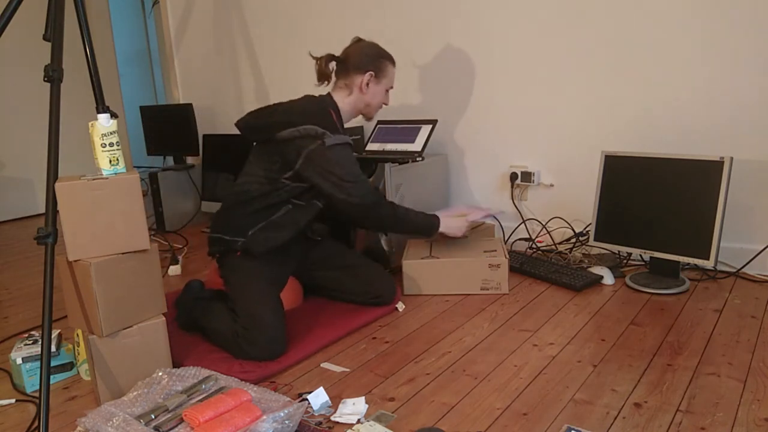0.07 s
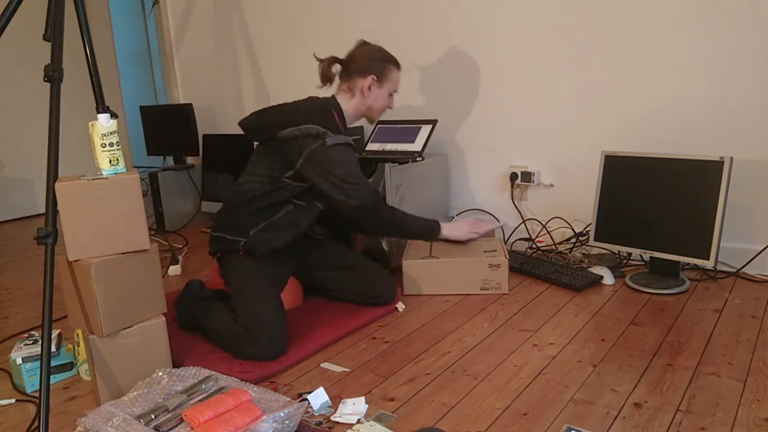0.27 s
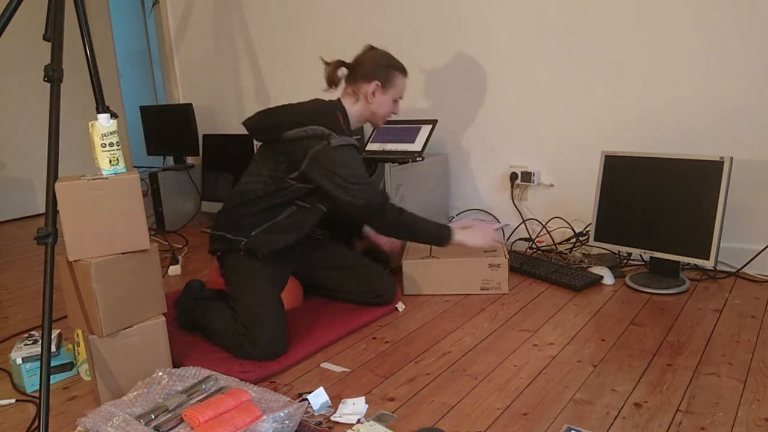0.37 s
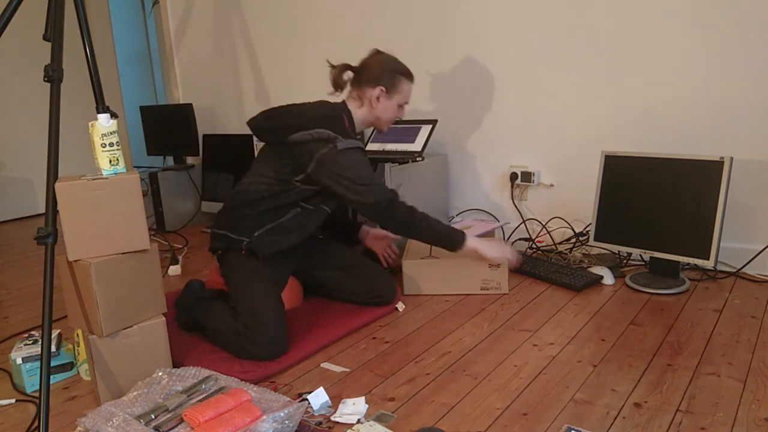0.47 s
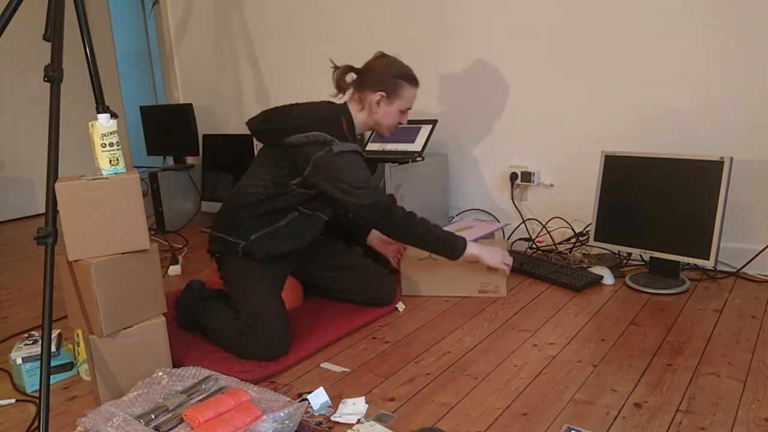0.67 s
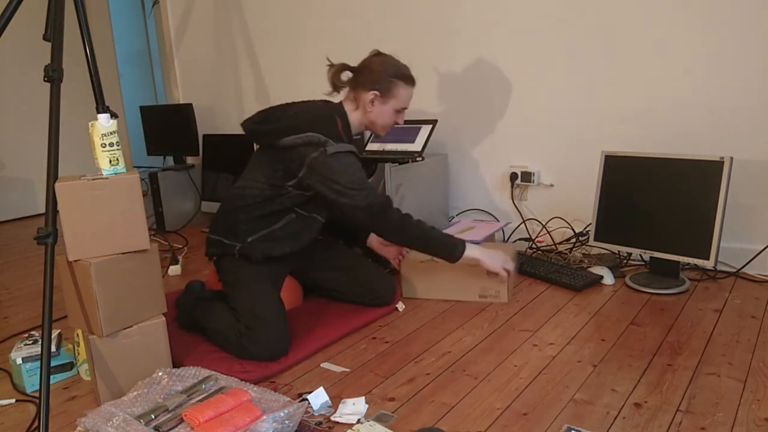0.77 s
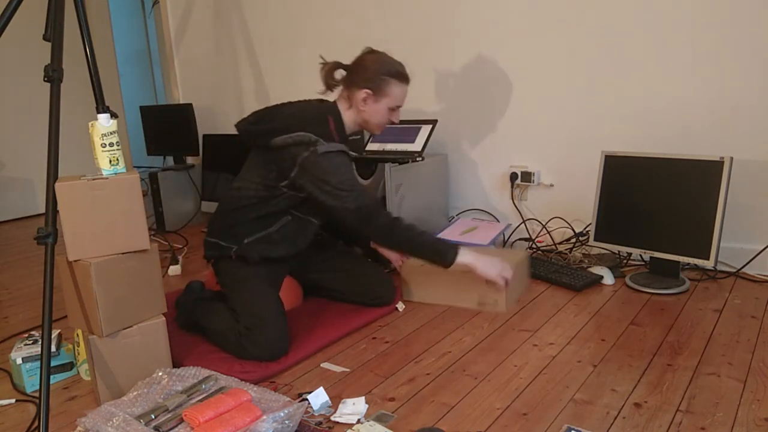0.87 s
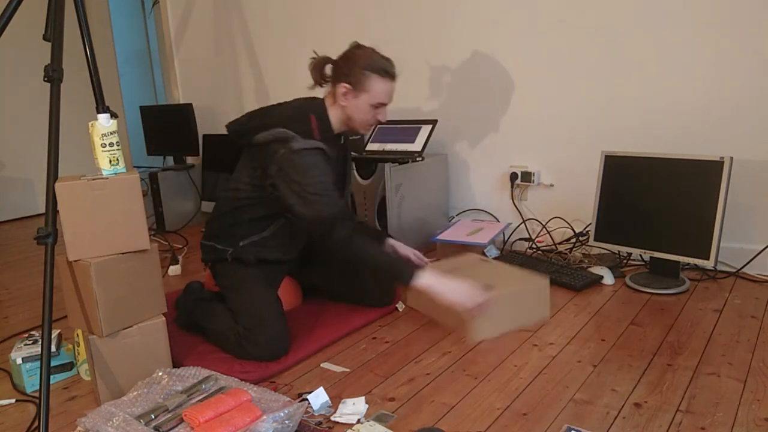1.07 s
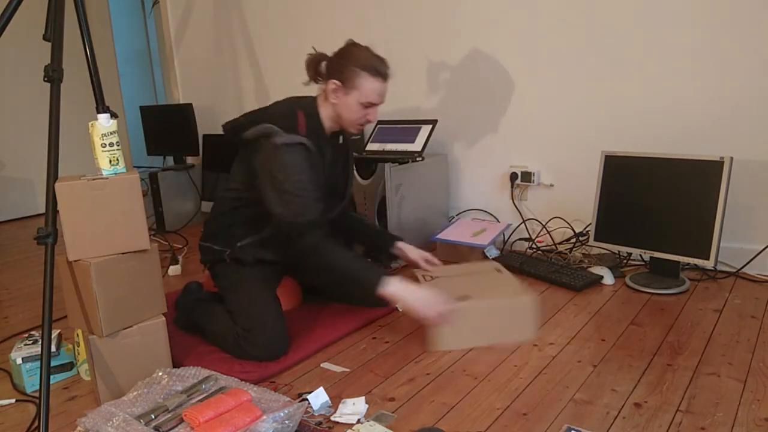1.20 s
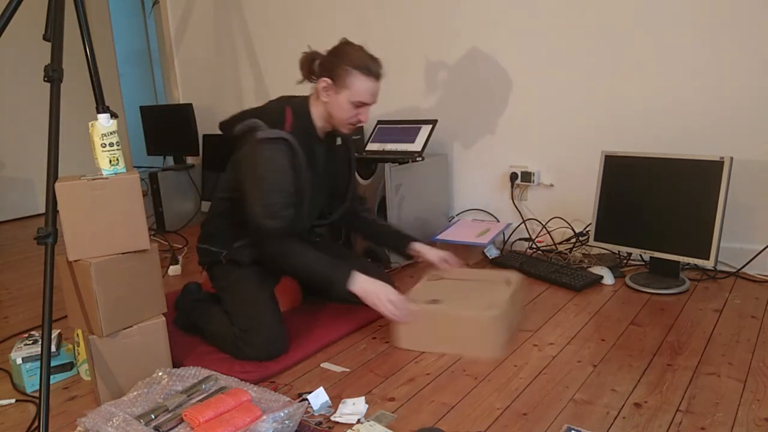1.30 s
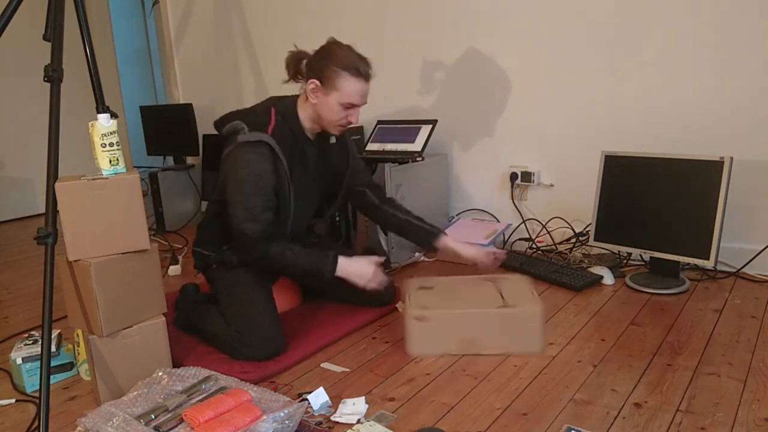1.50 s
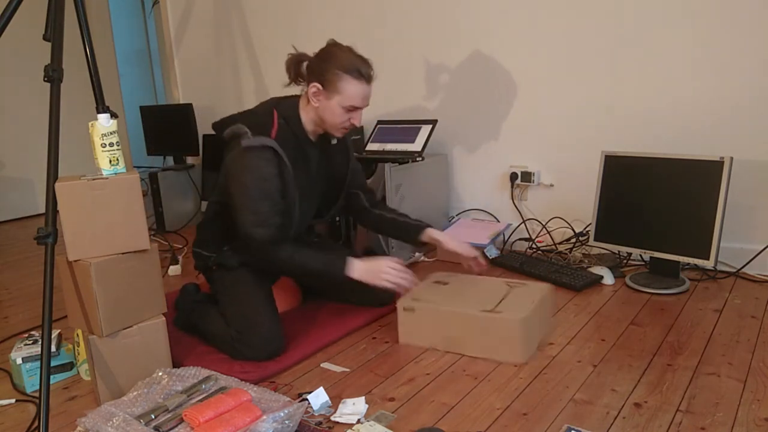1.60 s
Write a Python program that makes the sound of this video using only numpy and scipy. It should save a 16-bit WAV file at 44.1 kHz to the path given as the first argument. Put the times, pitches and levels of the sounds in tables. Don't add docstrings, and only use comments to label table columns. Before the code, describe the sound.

A small metal tool lands on a hollow cardboard box: faint ticks from 0.1 s, then a loud cluster of thuds and bright jingling rattles at 0.22-0.3 s, fading by 0.5 s. From about 0.6 s the box drags softly over floorboards, hissing and rumbling, with bumps and dry scuffs near 0.87, 1.05, 1.26 and 1.35 s. Short room echo, quiet hush and faint low hum.

```python
import sys
import numpy as np
from scipy import signal
from scipy.fft import rfft, irfft
from scipy.io import wavfile
from scipy.ndimage import uniform_filter1d

SR = 44100
rng = np.random.default_rng(int(sys.argv[2]) if len(sys.argv) > 2 else 0)


def bounce(signal):
    frames = np.transpose(np.atleast_2d(signal))
    limited = np.clip(frames, -1, 1)
    pcm = np.round(limited * 32767).astype(np.int16)
    wavfile.write(sys.argv[1], SR, pcm)


def nominal_scale(level):
    x = np.asarray(level, float) / 20
    return 10 ** x


N = 72765
T = np.arange(N) / SR

# (time [s], level [dB], contact [ms])
BLOWS = [(.2228, -17.5, 0.49), (.2285, -9, 1.7), (.232, -15.5, 3.7), (.2555, -7.5, 0.87),
         (.2572, -11.5, 0.69), (.2592, 1, 0.57), (.2635, -12.5, 0.76), (.266, -11, 0.54), (.2715, -3, 1.24),
         (.281, -11, 1.07), (.296, -22.5, 1.24), (.316, -15.5, 0.99), (.342, -13.5, 1.52),
         (.368, -18, 0.96), (.382, -16.5, 1.05), (.41, -36, 2.7), (.442, -28.5, 0.99), (.51, -35, 0.76)]
# (frequency [Hz], level [dB], t60 [s])
BOX = [(58.6, -53, 0.33), (108, -16.5, 0.12), (130, -32, 0.31), (180.3, 1, 0.042), (271, -6, 0.028),
       (342, -4, 0.054), (423, 0.5, 0.085), (540, 2.5, 0.058), (695, 0, 0.042), (756, 3.5, 0.027),
       (842, -6.5, 0.025), (1190, -12.5, 0.02), (1358, 5.5, 0.013), (1970, -21.5, 0.027)]

STRIKE_S, CHOKE_S = 0.0006, 0.005
RING_FLUTTER, RING_DAMP, TOOL_DETUNE = 0.55, 0.8, 0.008


def unit(x):
    return x / np.sqrt(np.mean(x ** 2))


def conv(x, h):
    return signal.fftconvolve(x, h)[:N]


def band_filter(x, order, low_hz, high_hz):
    return signal.sosfilt(signal.butter(order, [low_hz, high_hz], "band", fs=SR, output="sos"), x)


def colour(x, table):
    hz, db = np.array(table).T
    f = np.maximum(np.arange(N // 2 + 1) * SR / N, 1)
    return irfft(rfft(x) * nominal_scale(np.interp(np.log(f), np.log(hz), db)), N)


def walk(rate):
    k = int(SR / rate)
    return unit(uniform_filter1d(uniform_filter1d(rng.standard_normal(N), k), k))


def decay(t, t60):
    return np.exp(-np.log(1000) * t / t60)


def modes(table, gains=1, damp=1, detune=1):
    hz, db, t60 = np.array(table).T[:, :, None]
    t = T[:SR // 2]
    sign = (-1.0) ** np.arange(len(table))[:, None]
    tones = np.sin(2 * np.pi * hz * detune * t)
    return (sign * gains * nominal_scale(db) * decay(damp * t, t60) * tones).sum(axis=0)


def add(out, at_s, x):
    i = int(at_s * SR)
    out[i:i + len(x)] += x[:N - i]


def clicks(rate, spread_db):
    size = nominal_scale(spread_db * rng.exponential(size=N)) * rng.choice([-1, 1], N)
    return (rng.random(N) < rate / SR) * size


def burst(t, length):
    return t / length * np.exp(1 - t / length * 2)


def gaps_after(table):
    return np.abs(np.diff(np.array(table)[:, 0], append=N / SR))


def choke(t, gap):
    return np.exp(-np.maximum(t - gap, 0) / CHOKE_S)


def tool():
    # (time [s], tick [dB], low rings [dB], upper rings [dB])
    rattles = [(0.1033, -39, -48, -46), (0.117, -72, -55, -60), (0.14, -38.5, -48, -57),
               (0.163, -66, -52, -55), (0.182, -67, -55, -52), (0.221, -34, -45, -46),
               (0.2283, -15, -47, -35), (0.2394, -36, -30, -26.5), (0.2505, -15.5, -45, -22.5),
               (0.2592, -57, -39, -19), (0.2612, -21, -15, -6.5), (0.2644, -12, -49, -24),
               (0.274, -60, -17, -14), (0.28, -41, -23, -18), (0.2964, -13.5, -19.5, -26),
               (0.3036, -17.5, -22.5, -11.5), (0.3164, -70, -45, -29), (0.3393, -16.5, -64, -23),
               (0.364, -19.5, -50, -42), (0.3827, -43, -24.5, -44), (0.39, -27.5, -25, -22),
               (0.4104, -21, -33, -25), (0.4395, -28.5, -45, -49), (0.4588, -24, -53, -39),
               (0.4646, -61, -32, -33), (0.4796, -38, -37.5, -44), (0.524, -65, -42, -65),
               (0.627, -45, -47, -49.5), (0.8627, -38, -50, -44), (0.873, -51, -49, -72)]
    # (frequency [Hz], level [dB], t60 [s])
    metal = [(2600, -5, .05), (2900, -2, .09), (3210, -9, .04), (3440, -9, .03), (4110, -2, .07),
             (4840, 2, .08), (6000, -4, .03), (7210, -5, .05), (8880, 0, .06), (9400, -12, .02)]
    tick_s, chatter_s, chatter_db = 0.003, 0.015, -22
    tick_gain_db, ring_gain_db, ring_scatter_db = 0.5, -4.5, 2.2
    ticks, rings, t = np.zeros(N), np.zeros(N), T[:3000]
    high = np.array(metal)[:, :1] > 8000
    chance = rng.standard_normal((len(rattles), 2, len(metal), 1))
    shape = np.exp(-t / tick_s) + nominal_scale(chatter_db) * np.exp(-t / chatter_s)
    shape = shape * np.minimum(t / 0.00096, 1)
    for (s, tick_db, low_db, high_db), gap, c in zip(rattles, gaps_after(rattles), chance):
        contact = rng.standard_normal(3000) * shape
        gains = nominal_scale(np.where(high, high_db, low_db) + ring_scatter_db * c[0])
        ring = modes(metal, gains, RING_DAMP, 1 + TOOL_DETUNE * c[1])[:3000]
        flutter = uniform_filter1d(contact / shape.clip(1e-9), 90) * 9
        ring = ring * np.minimum(t / STRIKE_S, 1) * (1 + RING_FLUTTER * flutter)
        add(ticks, s, nominal_scale(tick_db + tick_gain_db) * band_filter(contact, 1, 1500, 6940))
        add(rings, s, nominal_scale(ring_gain_db) * ring * choke(t, gap) / 2)
    return ticks, rings


def crackles():
    # (time [s], crackle [dB], middle ring [dB], top ring [dB])
    top_contacts = [(0.1025, -47, -59, -72), (0.1407, -65, -67, -79), (0.1614, -70, -73, -80),
                    (0.1804, -68, -67, -77), (0.223, -43, -46, -57), (0.227, -33, -40, -52),
                    (0.2366, -40, -35, -43), (0.2504, -33, -36, -42), (0.2549, -28, -27, -41),
                    (0.2599, -13.5, -27, -40), (0.2623, -7, -30, -27), (0.2653, -16, -20.5, -43),
                    (0.2704, -13, -35, -43), (0.2757, -38, -21, -41), (0.279, -33, -26, -42),
                    (0.288, -35, -41, -36), (0.2967, -22, -25, -52), (0.3029, -29, -19, -40),
                    (0.3053, -38, -27, -52), (0.318, -27, -48, -40), (0.3386, -36, -29, -35),
                    (0.3633, -32, -36, -54), (0.3827, -38, -43, -54), (0.39, -32, -38, -53),
                    (0.3934, -41, -31, -50), (0.4063, -45, -36, -44), (0.408, -43, -38, -44),
                    (0.4184, -44, -40, -62), (0.4374, -44, -39, -52), (0.456, -48, -54, -53),
                    (0.4612, -42, -39, -59), (0.478, -41, -47, -65), (0.5104, -55, -46, -72),
                    (0.6275, -43, -58, -62), (0.8416, -37, -54, -66), (0.861, -44, -41, -60),
                    (0.8724, -42, -58, -69)]
    # (frequency [Hz], level [dB], t60 [s])
    top_modes = [(9890, -2, .05), (11680, 1, .1), (10900, -12, .02), (12800, -11, .02), (13600, -11, .02),
                 (14200, -11, .02)]
    crackle_gain_db, crackle_s, ring_gain_db = 0.5, 0.002, 3
    ticks, rings, t = np.zeros(N), np.zeros(N), T[:3000]
    chance = rng.standard_normal((len(top_contacts), len(top_modes), 1))
    for (s, tick_db, mid_db, top_db), gap, c in zip(top_contacts, gaps_after(top_contacts), chance):
        noise = rng.standard_normal((2, 3000))
        gains = nominal_scale(np.array([[mid_db]] + [[top_db]] * (len(top_modes) - 1)) + ring_gain_db)
        ring = modes(top_modes, gains, RING_DAMP, 1 + TOOL_DETUNE * c)[:3000]
        ring = ring * (1 + RING_FLUTTER * unit(uniform_filter1d(noise[0], 90)))
        bright = band_filter(noise[1], 2, 9000, 14800)
        add(ticks, s, nominal_scale(tick_db + crackle_gain_db) * bright * burst(t, crackle_s))
        add(rings, s, ring * np.minimum(t / STRIKE_S, 1) * choke(t, gap))
    return ticks, rings


def knocks(rows, body_modes, scatter_db, detune=0.035):
    body_gain_db, slap_gain_db, slap_s = -1, -7, 0.0053
    out, t = np.zeros(N), T[:2000]
    chance = rng.standard_normal((len(rows), len(body_modes), 1))
    for (s, db, ms), c in zip(rows, chance):
        push = np.hanning(int(ms * SR / 1000) + 3)
        ring = modes(body_modes, nominal_scale(scatter_db * c), detune=1 + detune * np.roll(c, 1))
        body = np.convolve(ring, push / push.sum())
        slap = rng.standard_normal(2000) * np.exp(-t / slap_s) * np.minimum(t / 0.00088, 1)
        add(out, s, nominal_scale(db + body_gain_db) * body / 3)
        add(out, s, nominal_scale(db + slap_gain_db) * band_filter(slap, 1, 900, 4000))
    return out


def landings():
    # (time [s], level [dB], contact [ms])
    pushes = [
        (.2275, -16, 2.46),
        (.2555, -12.5, 8.2),
        (1.003, -47, 8.4),
        (1.05, -39, 1.5),
    ]
    # (frequency [Hz], level [dB], t60 [s])
    thud = [(99.6, -0.5, 0.44), (136.6, 2, 0.22), (203, 7.5, 0.022), (341, 14, 0.053)]
    return knocks(pushes, thud, 0.38)


def drag():
    # (time [s], sliding speed as hiss [dB], weight on the box as rumble [dB])
    pull = [(0.6, -44, -37), (0.664, -54, -46.5), (0.798, -44, -45), (1.002, -41, -49.5),
            (1.012, -38.5, -48), (1.026, -40, -44.5), (1.222, -43, -42.5), (1.255, -42, -45),
            (1.311, -40.5, -47), (1.348, -39.5, -37.5), (1.482, -41, -43.5), (1.65, -46, -44.5)]
    # (frequency [Hz], density [dB per Hz])
    scrape = [(410, -1), (700, -10), (862, -7), (1080, -9), (1510, -6), (2890, -7.5), (5390, -7.5),
              (9070, -13), (15700, -28)]
    s, hiss_db, rumble_db = np.array(pull).T
    gate = np.clip((T - 0.54) / 0.16, 0, 1)
    hiss = unit(colour(clicks(14000, 1.3), scrape)) * nominal_scale(0.91 * walk(55))
    body = modes(BOX, nominal_scale(-0.4 * np.array(BOX)[:, 1:2]), damp=5.3)
    rumble = unit(conv(clicks(1200, 1.8), body))
    rumble = signal.sosfilt(signal.butter(2, 127, "high", fs=SR, output="sos"), rumble)
    hiss = hiss * nominal_scale(np.interp(T, s, hiss_db) + 0.5)
    rumble = rumble * nominal_scale(np.interp(T, s, rumble_db) - 2.5 + 0.75 * walk(24))
    return gate * (hiss + rumble)


def bumps():
    # (time [s], level [dB], contact [ms])
    joints = [(.688, -45, 3.3), (.7, -34.5, 0.56), (.715, -52, 1.7), (.754, -52, 0.31), (.866, -26.5, 2.4),
              (1.05, -27, 2.3), (1.078, -29, 0.21), (1.14, -27, 0.72), (1.186, -34, 0.62),
              (1.337, -36.5, 0.48), (1.362, -29, 0.4), (1.44, -49, 4.1)]
    return knocks(joints, BOX, 3.9)


def gap_drops():
    # (time [s], level [dB], contact [ms])
    drops = [
        (1.2625, -25, 0.18),
        (1.284, -44, 0.62),
    ]
    # (frequency [Hz], level [dB], t60 [s])
    board = [(187, -3, .25), (707, -7, .1), (268, -2, .25), (365, -3, .2), (325, 0, .3), (950, -4, .06),
             (860, 2, .13), (528, -6, .15)]
    settle_s, still_s = 1.297, 0.008
    return knocks(drops, board, 1.0, 0) * np.exp(-np.maximum(T - settle_s, 0) / still_s)


def scuffs():
    # (time [s], level [dB], centre [Hz], length [s], width [ratio])
    rubs = [(0.696, -40, 646, 0.0021, 1.2), (0.845, -53, 2180, 0.0027, 1.8),
            (0.855, -40.5, 1360, 0.016, 1.13), (0.881, -37, 1470, .008, 0.82),
            (1.0092, -28, 5000, 0.0012, 1.06), (1.012, -34.5, 3500, 0.0046, 1.34),
            (1.028, -35.5, 2400, 0.0058, 1.03), (1.06, -47, 2200, 0.0041, 1.3),
            (1.142, -38.5, 1300, 0.0047, 1.24), (1.144, -32, 5170, 0.0035, 1.1),
            (1.3403, -28, 1320, 0.0042, 1.35), (1.343, -36, 714, 0.0096, 0.82),
            (1.484, -42, 13000, .0096, 2.5)]
    out, t = np.zeros(N), T[:3000]
    for s, db, hz, length, width in rubs:
        ratio = max(width, 1.01)
        grit = band_filter(rng.standard_normal(3000), 1, hz / ratio, min(hz * ratio, SR / 2.5))
        add(out, s, nominal_scale(db) * unit(grit) * burst(t, length))
    return out


def joists():
    out, t = np.zeros(N), T[:SR]
    tone = np.sin(2 * np.pi * 63.9 * t) * decay(t, 0.79) * np.minimum(t / 0.31, 1)
    hardest_s = max(BLOWS, key=lambda row: row[1])[0]
    add(out, hardest_s, nominal_scale(-21.5) * tone)
    return out


def room():
    # (frequency [Hz], t60 [s])
    room_t60 = [(70, 0.45), (250, 0.64), (1000, 0.71), (4000, 0.47), (12000, 0.27)]
    hz, t60 = np.array(room_t60).T
    t, h = T[:SR], 0
    for f in 63 * 2.0 ** np.arange(9):
        octave = band_filter(rng.standard_normal(SR), 2, f / np.sqrt(2), min(f * np.sqrt(2), SR / 2.1))
        h = h + octave * decay(t, np.interp(np.log(f), np.log(hz), t60))
    h = h * np.clip((t - 0.003) / 0.009, 0, 1)
    return h / np.sqrt(np.sum(h ** 2))


def echoes(send):
    turn = 2 * np.pi * 4 * T + walk(8.2)
    return np.cos(turn) * conv(send, room()) + np.sin(turn) * conv(send, room())


def hush():
    # (frequency [Hz], density [dB per Hz])
    air = [(40, -19), (80, -11), (120, -41), (160, -15), (230, 4.5), (500, -5.5), (1000, -16.5),
           (3000, -13), (15700, -34)]
    return unit(colour(rng.standard_normal(N), air)) * nominal_scale(-57.5 + 0.59 * walk(23))


def mains_hum():
    # (frequency [Hz], level [dB rms])
    tones = [(120, -66), (203, -68)]
    return sum(nominal_scale(db + 3.5 + 4.6 * walk(33)) * np.sin(2 * np.pi * hz * T) for hz, db in tones)


def scene():
    ticks, rings = np.add(tool(), crackles())
    box = knocks(BLOWS, BOX, 3.1) + landings() + bumps() + gap_drops()
    slide = drag() + scuffs()
    send = nominal_scale(-8) * box + nominal_scale(-3) * (ticks + nominal_scale(-10) * rings) + nominal_scale(-14.5) * slide
    near = ticks + rings + box + slide
    return np.tile(near + joists() + echoes(send) + hush() + mains_hum(), (2, 1))


def top_cut(x):
    return signal.sosfilt(signal.butter(12, 15820, fs=SR, output="sos"), x)


def record(dry):
    x = signal.sosfilt(signal.butter(5, 59, "high", fs=SR, output="sos"), dry)
    x = signal.sosfilt(signal.ellip(8, 0.2, 60, 15700, fs=SR, output="sos"), np.tanh(x))
    top = signal.cheby2(10, 90, [8800, 15600], "band", fs=SR, output="sos")
    patches = walk(3000) * nominal_scale(-12 + 4 * walk(21))
    side = signal.sosfilt(top, signal.sosfilt(top, x[0]) * patches)
    return top_cut(x + np.array([side, -side]))


dry = scene()
out = record(dry)
bounce(out)
```